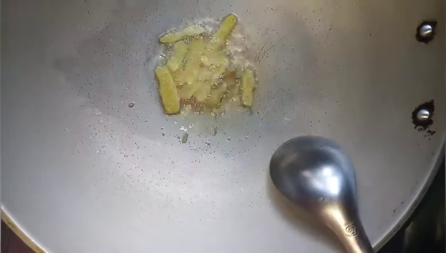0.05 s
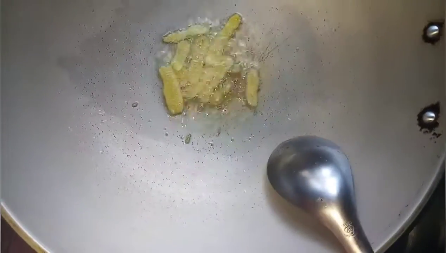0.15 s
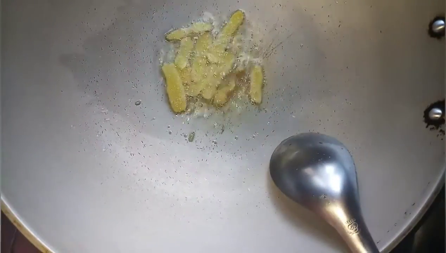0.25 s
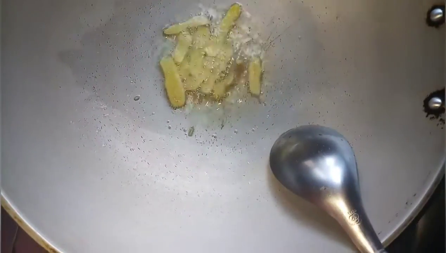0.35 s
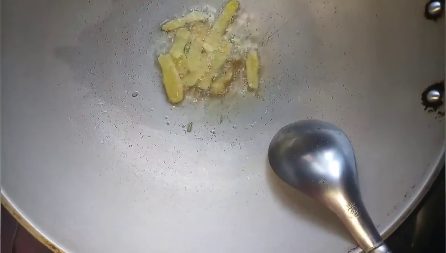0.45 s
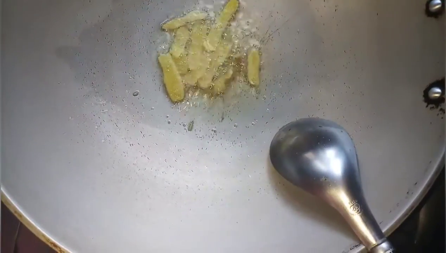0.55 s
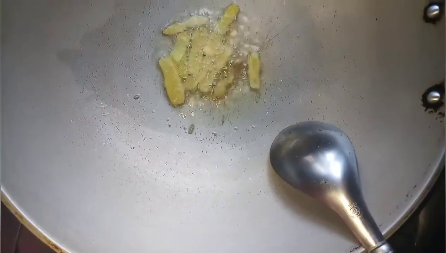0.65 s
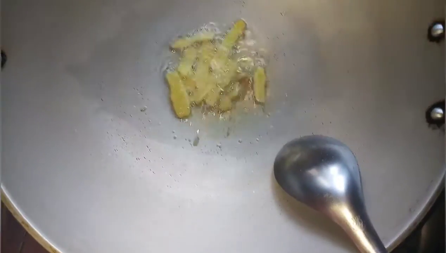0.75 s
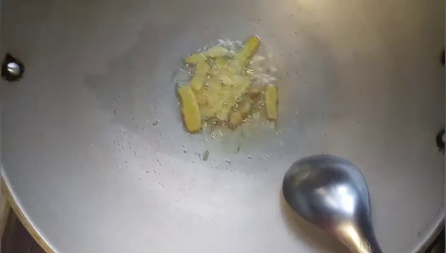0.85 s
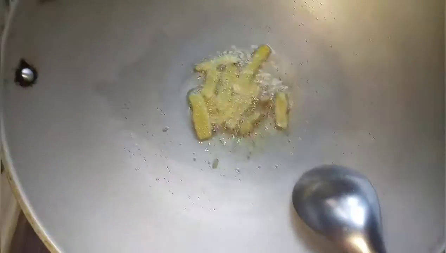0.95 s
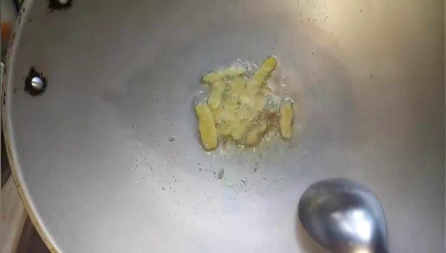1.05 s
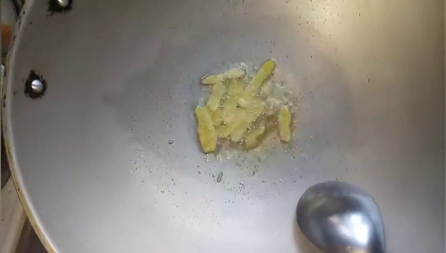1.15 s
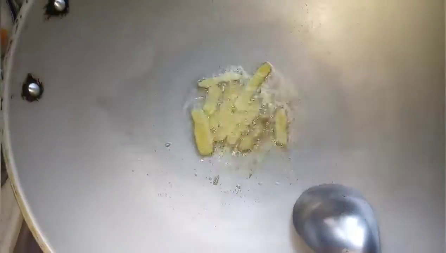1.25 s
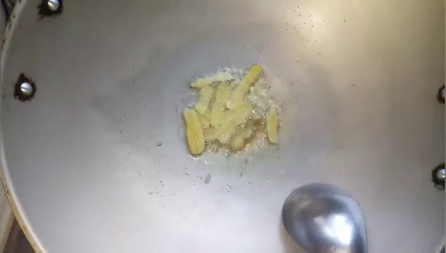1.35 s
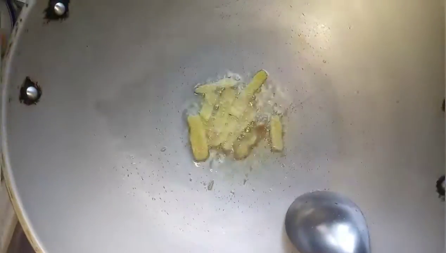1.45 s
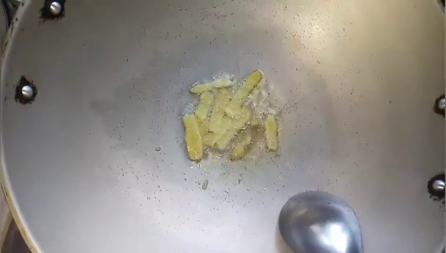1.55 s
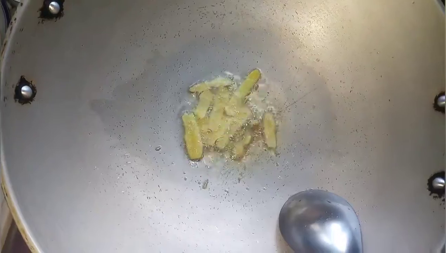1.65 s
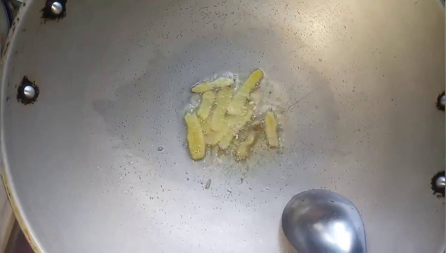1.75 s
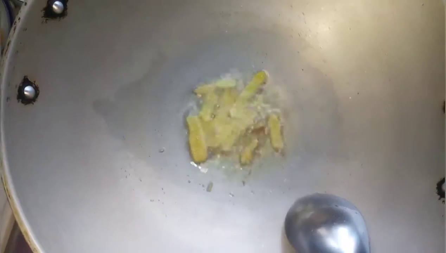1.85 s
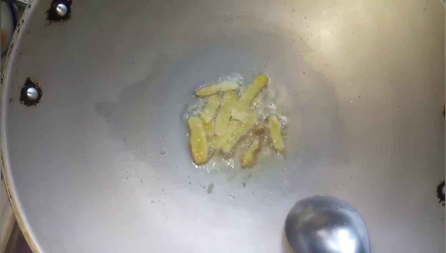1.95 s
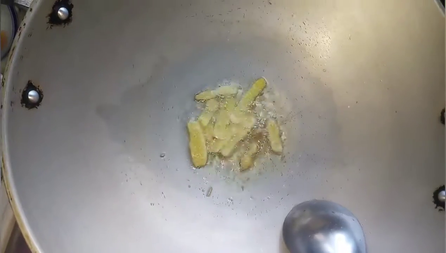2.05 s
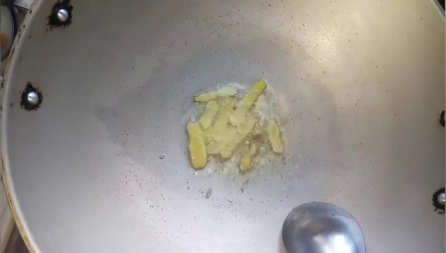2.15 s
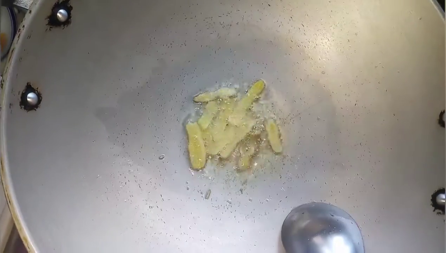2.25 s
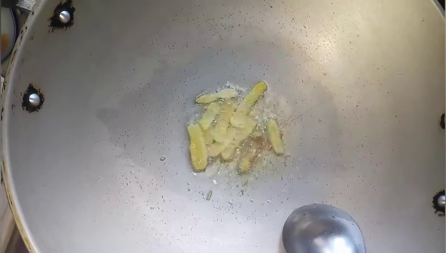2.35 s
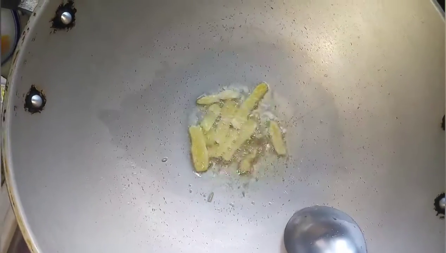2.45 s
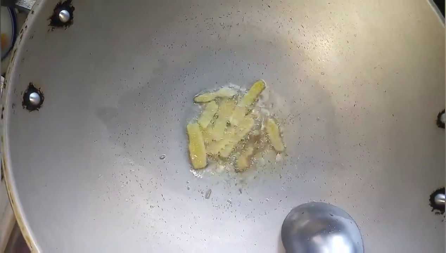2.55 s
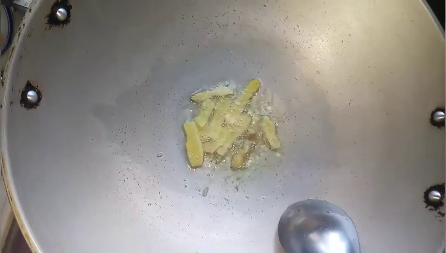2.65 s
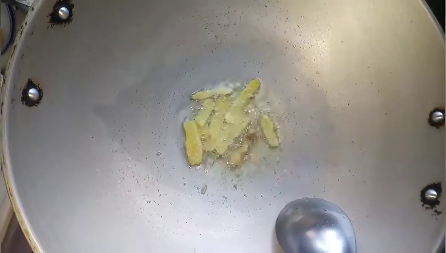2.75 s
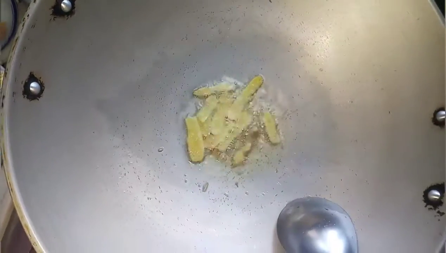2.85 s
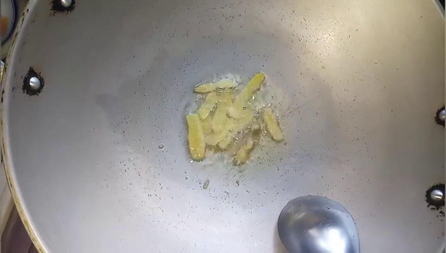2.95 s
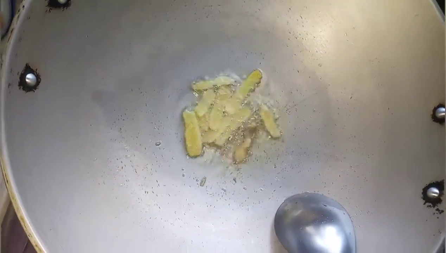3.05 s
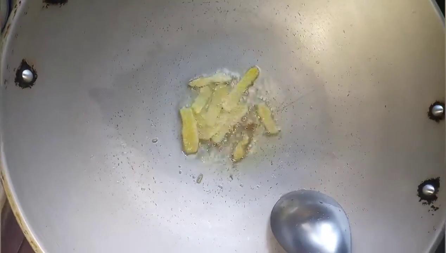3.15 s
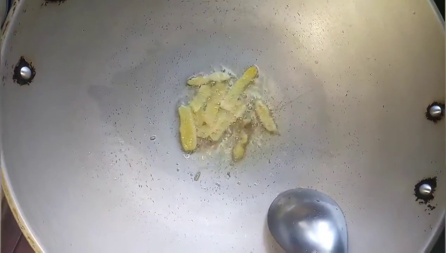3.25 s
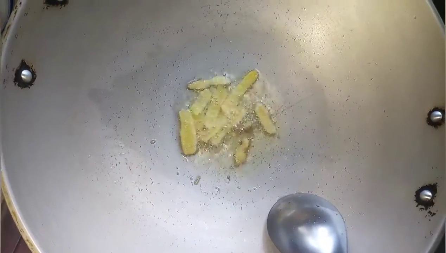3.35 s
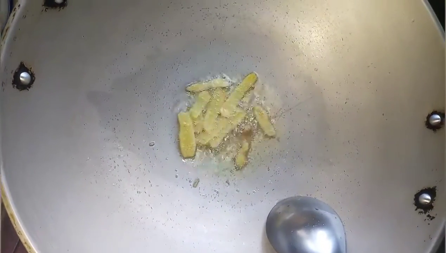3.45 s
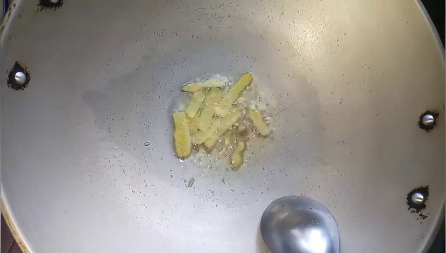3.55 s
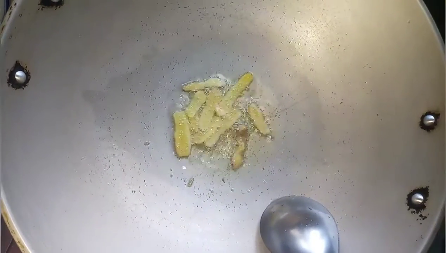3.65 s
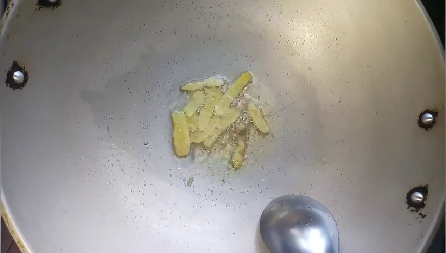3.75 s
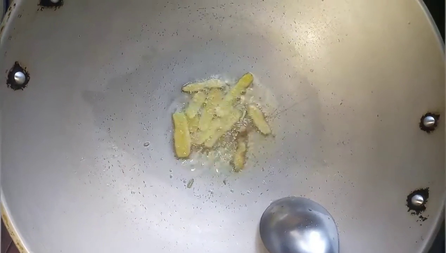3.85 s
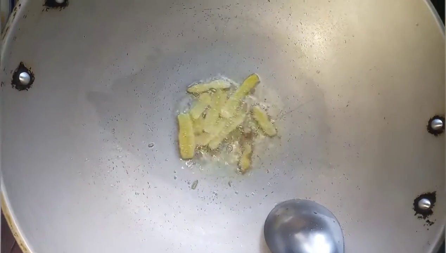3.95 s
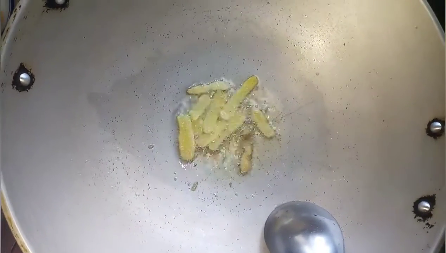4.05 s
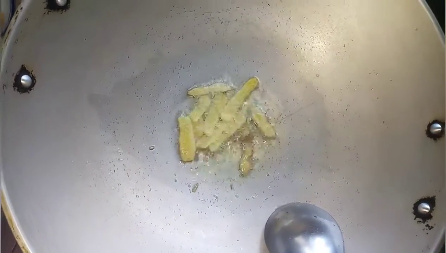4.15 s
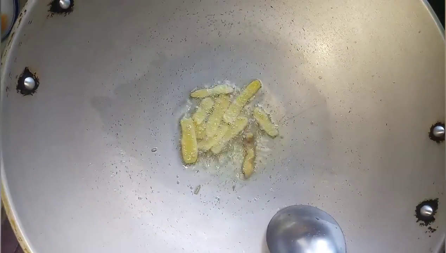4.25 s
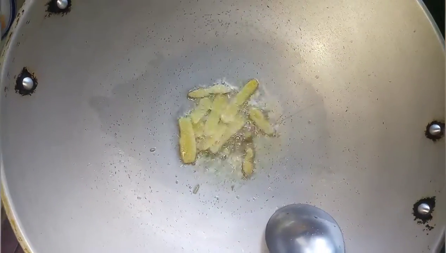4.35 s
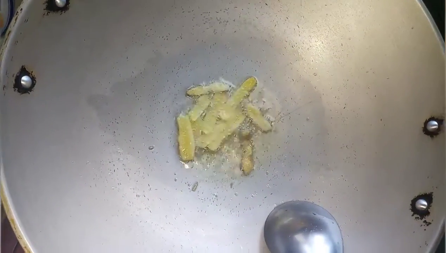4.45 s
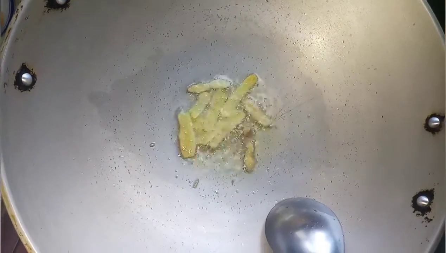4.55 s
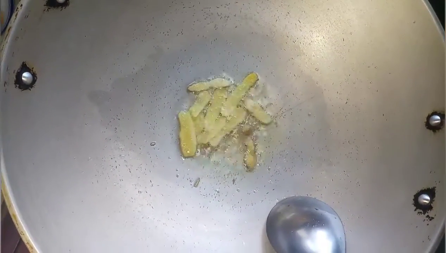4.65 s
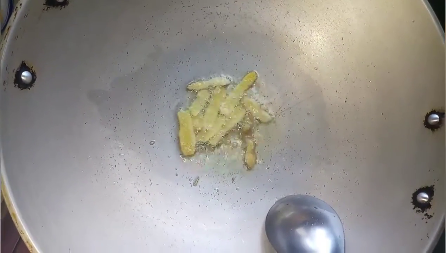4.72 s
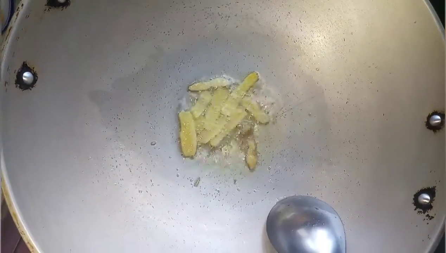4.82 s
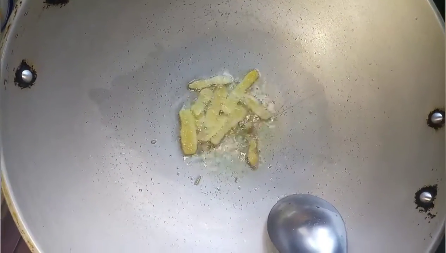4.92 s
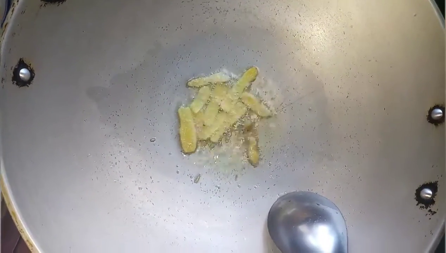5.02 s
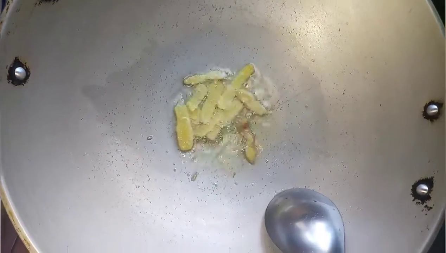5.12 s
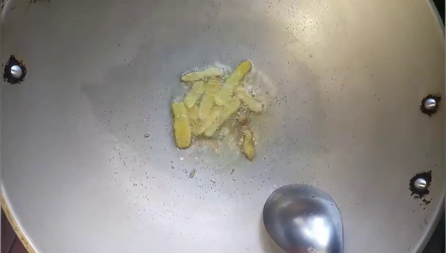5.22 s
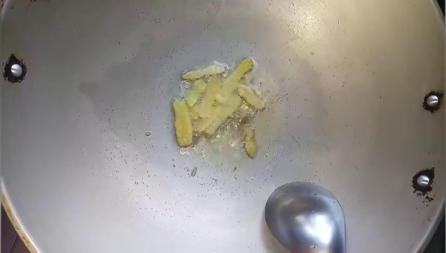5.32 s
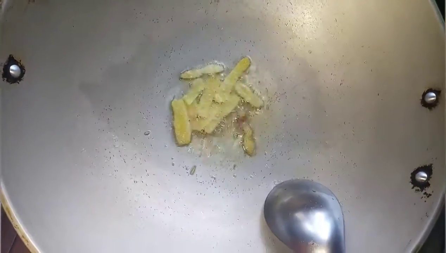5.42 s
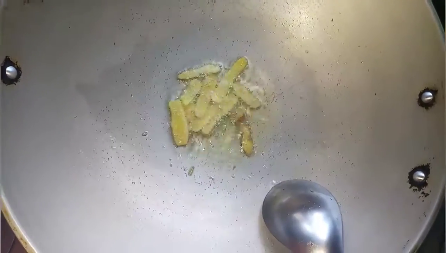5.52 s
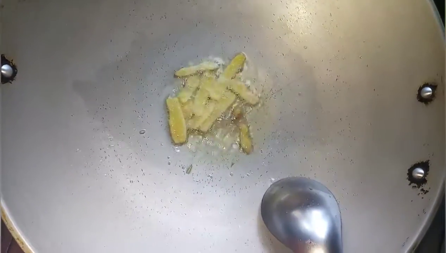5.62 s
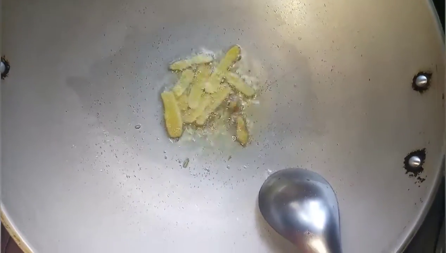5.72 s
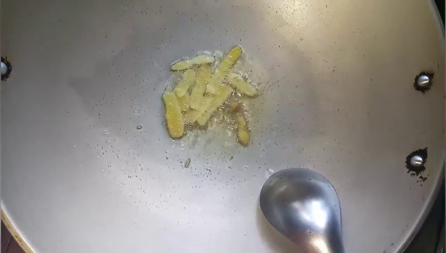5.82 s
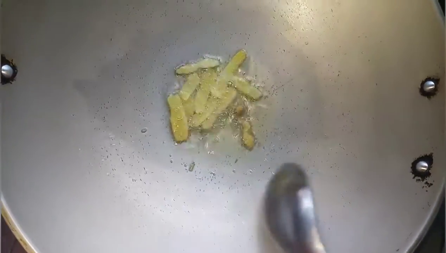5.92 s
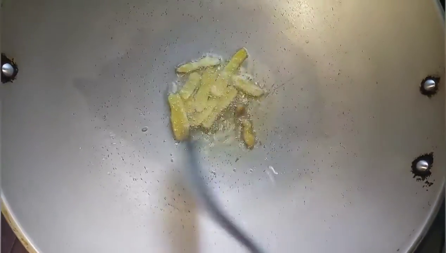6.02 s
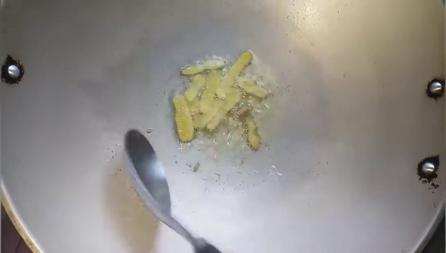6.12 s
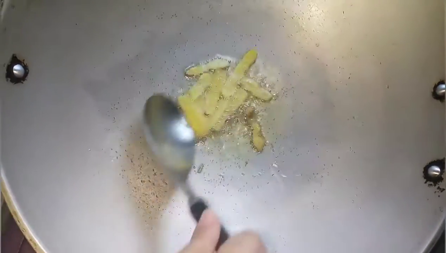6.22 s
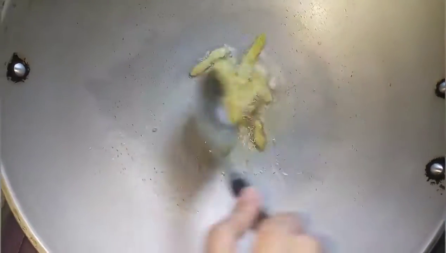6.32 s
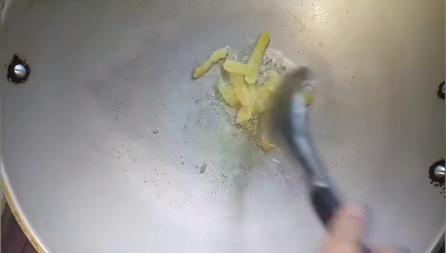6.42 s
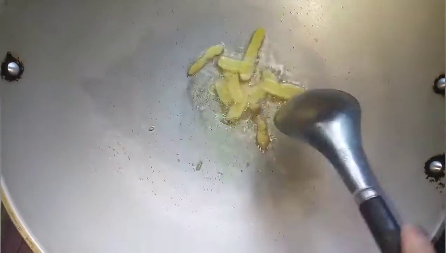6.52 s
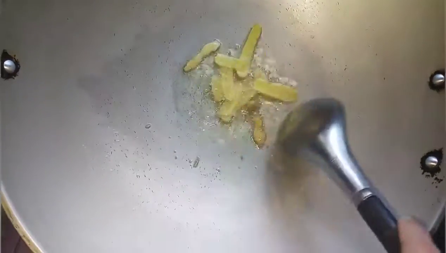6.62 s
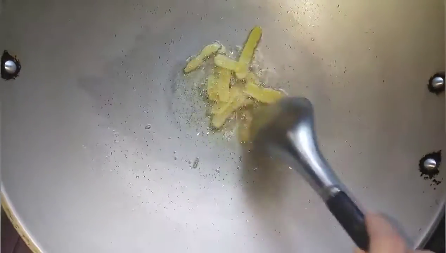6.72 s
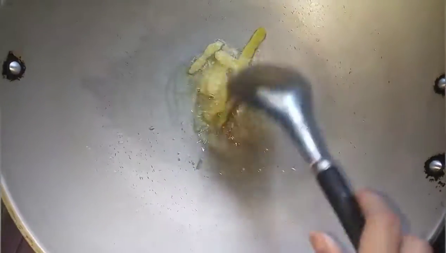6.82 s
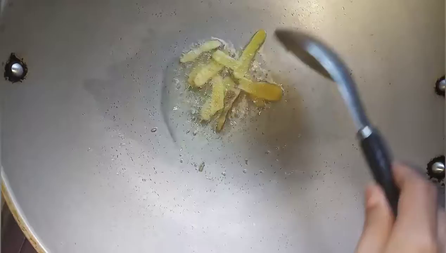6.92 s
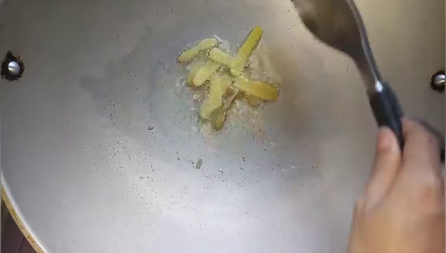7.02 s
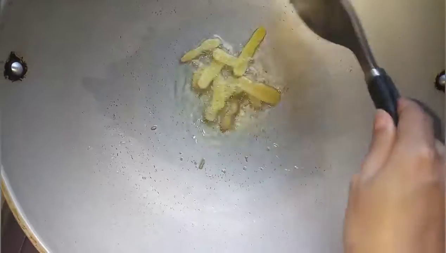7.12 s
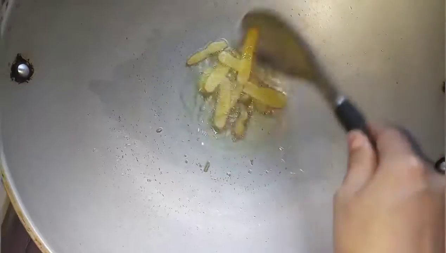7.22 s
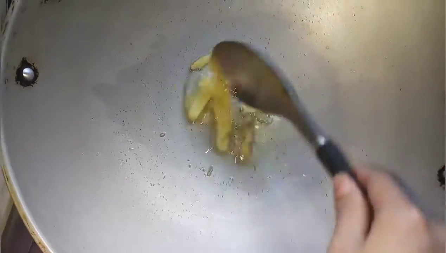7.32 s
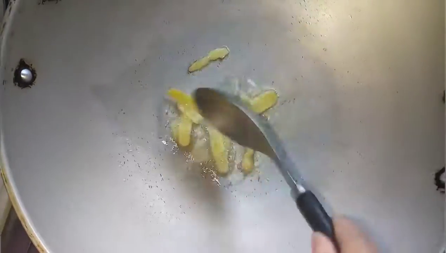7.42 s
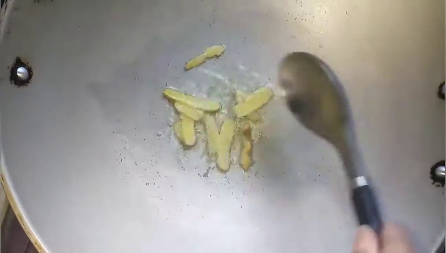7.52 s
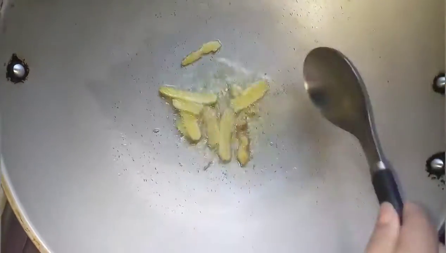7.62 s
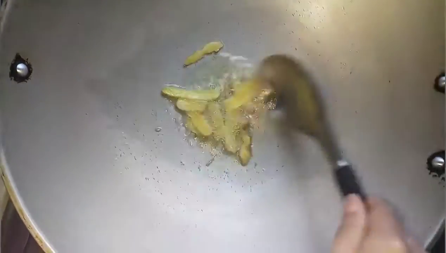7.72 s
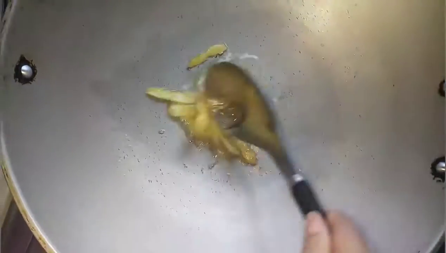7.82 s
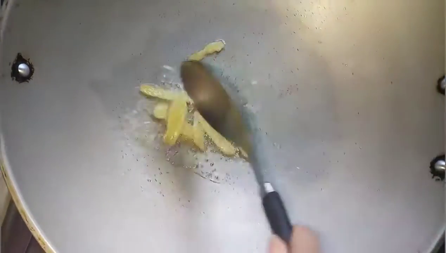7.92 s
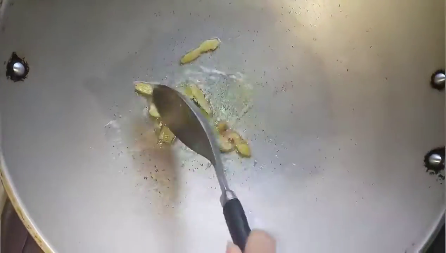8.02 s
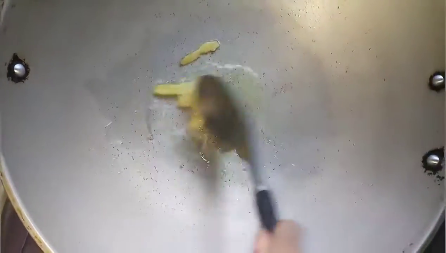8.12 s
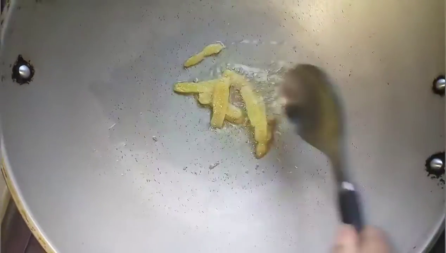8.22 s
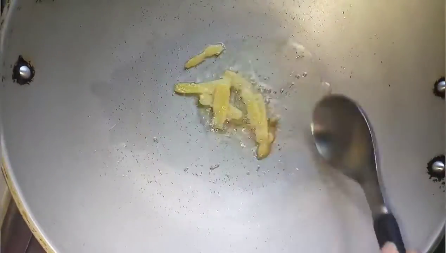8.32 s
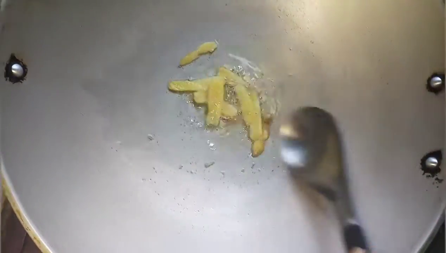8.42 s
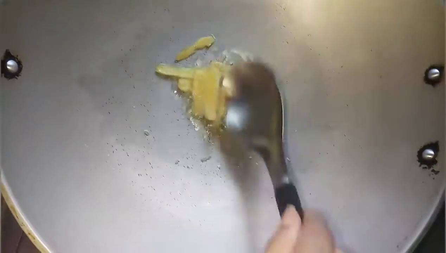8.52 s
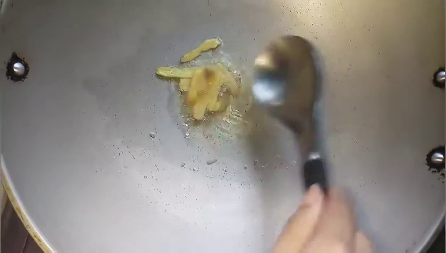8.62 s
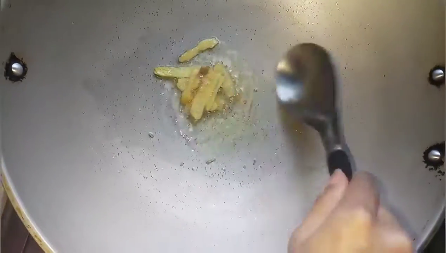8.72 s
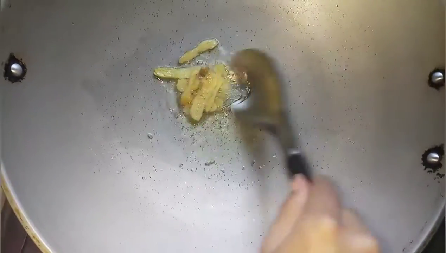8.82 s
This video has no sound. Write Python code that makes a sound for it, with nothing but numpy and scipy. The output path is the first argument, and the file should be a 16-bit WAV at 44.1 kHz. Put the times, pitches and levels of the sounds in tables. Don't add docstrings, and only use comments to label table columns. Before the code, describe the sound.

Steady frying hiss and snapping oil over a soft burner rumble, followed by bright ladle knocks and short scrapes on resonant steel.

```python
import sys
import numpy as np
from scipy import signal
from scipy.fft import rfft, irfft, next_fast_len
from scipy.io import wavfile
from scipy.ndimage import uniform_filter1d

SR = 44100
rng = np.random.default_rng(int(sys.argv[2]) if len(sys.argv) > 2 else 0)


def put_to_file(sound):
    columns = np.atleast_2d(sound).T
    safe = np.clip(columns, -1, 1)
    whole_steps = np.round(safe * 32767)
    wavfile.write(sys.argv[1], SR, whole_steps.astype(np.int16))


def elevation(decibels):
    levels = np.asarray(decibels, float)
    return 10 ** (levels / 20)


N = 391166
SIZE = next_fast_len(N, real=True)
HZ = np.fft.rfftfreq(SIZE, 1 / SR)
STEADY_DB = -48

# time [s], level [dB].
HEAT_CURVE = [(0.0, -47), (0.24, -47.5), (0.5, -51), (0.99, -48), (1.95, -46.5), (2.39, -46.5),
              (2.7, -47.5), (3.3, -48.5), (3.63, -46), (4.3, -47), (5.01, -46), (5.41, -48), (5.83, -47),
              (6.5, -48.5), (7.5, -51), (8.2, -50.5), (8.35, -46.5), (8.87, -46.5)]
# frequency [Hz], density [dB per Hz].
BUBBLE_SPECTRUM = [(410, -3), (700, -1), (863, -14.5), (1010, -2), (1250, -8.5), (1480, -5.5), (1680, -13),
                   (2270, -7), (2920, -13), (3160, -0.5), (4380, -6), (7010, -4), (13300, -20),
                   (16000, -26)]
# frequency [Hz], width [Hz], level [dB].
BOWL_MODES = [(976, 28, 3.5), (1380, 140, -2), (2040, 450, -13), (2800, 21, 17), (3130, 43, 1),
              (3600, 66, -7), (6900, 220, -28)]
# frequency [Hz], density [dB per Hz].
FLAME_SPECTRUM = [(15, -50), (25, -20), (54, -9), (85, -2.5), (114, -5.5), (151, -3.5), (301, -8.5),
                  (345, -7), (509, -14), (565, -11.5), (900, -24), (1170, -44), (1980, -120)]
# frequency [Hz], width [Hz], level [dB rms].
FAN_TONES = [(87.5, 9.04, -55), (143.4, 15.4, -60)]
# time [s], peak [dB], frequency [Hz], decay time t60 [s].
KNOCK = (2.5308, -30, 125, .04)
# start [s], peak [dB], pitch [Hz], echo t60 [s], broad crack [dB].
SPITTING_BUBBLES = [(0.0873, -23.5, 3970, 0.07, -4), (0.249, -34, 4760, 0.097, 9),
                    (0.257, -11.5, 3720, 0.12, -2), (0.2584, -17.5, 6050, 0.059, -20),
                    (0.5556, -16.5, 6040, 0.03, -5.5), (0.7666, -22.5, 3130, 0.039, 2),
                    (0.7692, -35, 6400, 0.023, -24), (1.7214, -16, 5900, 0.021, -1.5),
                    (2.1129, -3, 3620, 0.041, -14), (2.1132, -19, 6790, 0.042, -18),
                    (2.3424, -22.5, 7500, 0.078, -5), (2.4184, -14, 4380, 0.067, -7.5),
                    (2.4183, -4.5, 3650, 0.0096, -20), (3.6226, -8.5, 3030, 0.087, -13),
                    (3.688, -19.5, 5350, 0.05, -7), (3.689, -23.5, 3330, 0.04, -20),
                    (5.2106, -19.5, 6800, 0.053, -8), (7.431, -28.5, 3600, 0.053, 3),
                    (7.6197, -18.5, 6170, 0.027, -4.5), (6.201, -40, 14300, 0.04, -30),
                    (8.457, -38, 12500, 0.04, -30), (8.778, -27, 12400, 0.06, -30)]
# start [s], peak [dB], pitch [Hz],
# broad crack [dB].
SMALL_BUBBLES = [(0.6477, -25.5, 5300, -1), (0.9662, -34.5, 3400, -1), (1.6536, -37, 3280, 2),
                 (1.815, -36, 7400, -8), (1.955, -47, 3500, 17), (2.375, -30, 5160, 7),
                 (2.9203, -36, 3400, -6), (3.072, -42.5, 3440, 11.5), (3.4528, -30.5, 3560, -10),
                 (4.046, -30, 8960, 1), (4.1754, -36, 5850, -3), (4.3685, -35, 3130, 7),
                 (4.7107, -30.5, 7760, -8), (5.04, -34.5, 9300, 0), (5.1058, -29, 5560, 3),
                 (5.938, -25, 3700, -8), (5.947, -31, 4500, -11), (5.965, -29, 3340, -13),
                 (6.121, -26, 7200, -8), (6.93, -36, 5950, 1), (6.975, -40, 6000, -5),
                 (7.1034, -38, 5700, 9.5), (7.1526, -37, 7300, -10), (3.02, -36, 5500, -6),
                 (7.7508, -29, 6700, -3), (8.1369, -35, 3730, 7), (8.2315, -31.5, 3380, 2.5),
                 (8.243, -33, 3900, 1), (8.6223, -35.5, 2960, -3), (8.775, -20, 5300, -4)]
# start [s], peak [dB], pitch [Hz], echo t60 [s].
DEEP_POCKETS = [(0.087, -36.5, 1500, 0.09), (0.255, -21.5, 1140, 0.062), (0.257, -35, 312, 0.24),
                (0.257, -23, 2400, 0.18), (3.6235, -30, 2200, 0.06), (1.031, -36, 1040, 0.045),
                (2.921, -32.5, 1450, 0.028), (3.452, -32.5, 1320, 0.041), (4.461, -36, 1970, 0.078),
                (5.98, -41, 1050, 0.044), (6.088, -38.5, 1030, 0.052), (6.759, -21, 750, 0.056),
                (6.202, -28, 393, 0.14), (7.245, -34, 800, 0.08), (7.778, -36, 650, 0.08)]
# start [s], peak [dB], pitch [Hz], echo t60 [s].
STEAM_WHISTLES = [(7.432, -22, 3600, 0.062), (0.647, -30, 5550, 0.08), (0.25, -24, 1220, 0.12),
                  (0.26, -28, 900, 0.16), (3.63, -31, 4700, 0.084), (8.505, -33, 1450, 0.14),
                  (0.06, -39, 3750, 0.45), (0.3, -41, 2900, 0.17), (2.125, -34, 3700, 0.15),
                  (2.462, -29, 4800, 0.072), (3.646, -30, 2850, 0.14), (5.9, -35, 3700, 0.082),
                  (6.319, -26, 2570, 0.15), (7.794, -29, 2290, 0.15)]
# start [s], peak [dB], pitch [Hz], echo t60 [s], width [share of pitch].
SINGLE_MODES = [(6.759, -20, 1500, .04, .35), (6.759, -24, 2000, .04, .25), (6.759, -20, 2785, .06, .05),
                (6.759, -24, 4580, .05, .06), (6.759, -24, 6120, .05, .08), (6.759, -21, 7300, .05, .1),
                (6.76, -30, 9010, .05, .06), (6.76, -27, 8200, .06, .2), (6.762, -38, 11000, .04, .15),
                (6.215, -30, 10500, .08, .05), (6.203, -14, 4700, .035, .25), (6.217, -43, 14000, .1, .06),
                (6.2165, -11, 4300, .03, .3), (6.217, -24, 7000, .05, .1), (8.851, -22, 3130, .07, .05),
                (6.307, -27, 3500, .06, .08), (7.2468, -5, 3500, .012, .35), (7.248, -17, 3130, .07, .06),
                (8.785, -17, 3980, .08, .05), (7.245, -27, 210, .1, .5), (7.245, -30, 500, .04, .5),
                (7.294, -22, 3200, .05, .1), (7.777, -22, 3250, .03, .15), (7.786, -20, 3200, .03, .15),
                (7.777, -30, 7000, .04, .06), (7.797, -30, 5500, .05, .1), (7.777, -36, 400, .04, .5),
                (7.809, -39, 350, .05, .5), (8.468, -21, 3150, .03, .1), (8.527, -25, 4100, .04, .12),
                (8.534, -22, 3150, .04, .08), (8.508, -33, 6800, .1, .06), (8.545, -34, 2450, .1, .1),
                (8.778, -17, 5050, .05, .08), (0.086, -37, 900, .08, .2), (0.087, -36, 2000, .05, .25),
                (0.09, -38, 1420, .06, .08), (0.088, -35, 4800, .05, .15), (3.624, -27, 2100, .06, .2),
                (0.766, -34, 2200, .05, .25)]
# start [s], peak [dB], bowl band 0.9-2.6 kHz [dB], rim band above 4.5 kHz [dB], echo t60 [s].
LADLE_BLOWS = [(6.1879, -26.5, -31, -9, 0.045), (6.201, -8, -14, -3, 0.045), (6.2165, -17, -25, -4, 0.05),
               (6.759, -7, -11, -18, 0.04), (7.2445, -12, -20, -5.5, 0.12), (7.7757, -28, -34, -9, 0.11),
               (7.7841, -25, -8, -9, 0.07), (7.8064, -28, -28, -7, 0.082), (8.4574, -13, -15.5, -7, 0.13),
               (8.5342, -29, -31, -6, 0.13), (8.7773, -10, -12, -1.5, 0.1), (8.8503, -22, -27, -17, 0.072)]
# time [s], pressure [dB].
SCRAPE_PRESSURES = [
    [(5.88, -60), (5.9, -53), (5.968, -37), (6.02, -65)],
    [(6.21, -17), (6.25, -28), (6.266, -24), (6.34, -28.5), (6.385, -54)],
    [(6.775, -18), (6.783, -25), (6.809, -29), (6.87, -57)],
    [(7.255, -30), (7.285, -27), (7.295, -23.5), (7.317, -28), (7.38, -52)],
    [(7.78, -33), (7.81, -23), (7.822, -41), (7.84, -42), (7.88, -48)],
    [(8.17, -48), (8.216, -41.5), (8.244, -42), (8.28, -64)],
    [(8.47, -32), (8.49, -33), (8.534, -24), (8.574, -38.5), (8.6, -58)],
    [(8.79, -17), (8.814, -30), (8.846, -29.5), (8.856, -23), (8.87, -32)],
]
# thud [dB], bowl [dB], rim [dB].
SCRAPE_TOUCHES = [(-23.5, -8, -9), (-24, -7, -8), (-15, -6.5, -11), (-22, -13, -5.5), (-22.5, -11.5, -6.5),
                  (-28, -9.5, -7), (-24, -12, -8.5), (-23.5, -6.5, -12)]
# frequency [Hz], width [Hz], level [dB].
STRUCK_MODES = [(208, 14, -15), (1445, 48, -16), (2315, 32, -14), (2787, 28, -9), (3132, 59, 0.5),
                (3150, 180, -13.5), (3400, 25, -11), (3640, 40, -12), (3990, 47, -2.5), (4770, 25, -7),
                (4950, 35, -5), (5350, 57, -2.5), (5630, 29, -11), (5980, 117, -6.5), (6790, 140, -2),
                (7290, 40, -10), (7100, 31, -7), (7980, 50, -8.5), (8300, 17, -11), (8070, 190, -20.5),
                (8990, 40, -15), (8960, 100, -23.5), (10500, 27, -36), (10470, 43, -15)]
# frequency [Hz], width [Hz], level [dB].
RUBBED_MODES = [(387, 24, -33), (1332, 70, -11.5), (2274, 103, -2), (2465, 8.5, 1.5), (2733, 11, 1.5),
                (3033, 46, 5), (3400, 74, 0), (3960, 45, 0), (4640, 48, 1), (5300, 36, -9),
                (5300, 170, -3.5), (5760, 170, -2), (6200, 71, -5), (6790, 200, -2.5), (7440, 53, -6),
                (7750, 120, -14), (8600, 36, -14), (8500, 42, -36), (10400, 54, -12), (11200, 25, -37),
                (12100, 70, -63), (12100, 29, -32)]
# frequency [Hz], width [Hz], level [dB].
SCRATCH_MODES = [(11800, 500, -22.5), (13500, 1900, -28), (14500, 400, -25)]
# frequency [Hz], density [dB per Hz].
DENSE_MODES = [(71, -58), (120, -12), (378, -3), (789, -15.5), (1460, -20.5), (1750, -12), (3050, -5.5),
               (3900, 4), (4410, -0.5), (10400, -13.5), (16000, -61)]
# frequency [Hz], coherence [0-1].
PORT_LIKENESS = [(25, .8), (60, .95), (150, .89), (350, .89), (700, .62), (1400, .55), (2500, .4),
                 (12000, .15)]
# frequency [Hz], left minus right [dB].
PORT_BALANCE = [(60, 1.5), (200, -0.5), (380, -1), (700, 0.5), (1290, 3), (2380, -3.5), (4400, -2.5),
                (8120, -0.5), (15000, 3)]


def evened(x):
    return x / np.sqrt(np.mean(x ** 2) + 1e-20)


def read(points, hz):
    f, value = np.transpose(points)
    return np.interp(np.log(hz + 1), np.log(f + 1), value)


def coloured(x, gain):
    return irfft(rfft(x, SIZE) * gain, SIZE)[..., :N]


def modes(table, hz):
    response = 0
    for k, (f, width, db) in enumerate(table):
        response = response + (-1) ** k * elevation(db) / (1 + 2j * (hz - f) / width)
    return response


def add(mix, s, sound):
    part = mix[..., round(s * SR):][..., :sound.shape[-1]]
    part += sound[..., :part.shape[-1]]


def heat(follows):
    s, heat_db = np.transpose(HEAT_CURVE)
    return elevation(follows * (np.interp(np.arange(N) / SR, s, heat_db) - STEADY_DB))


def bubble_hiss():
    frames = N // 64 + 5
    a, b, c, d, patches = rng.standard_normal((frames, 129, 5)).T
    patches = evened(uniform_filter1d(uniform_filter1d(patches, 5, 0), 40, 1))
    flicker = evened(uniform_filter1d(rng.standard_normal(frames), 25))
    spectrum = np.array([a + 1j * b, c + 1j * d]) * elevation(0.94 * patches + 1.44 * flicker)
    return signal.istft(spectrum, nperseg=256, noverlap=192)[1][:, :N]


def bubble_crackle():
    crackle, t = np.zeros((2, N)), np.arange(1500) / SR
    hz = np.fft.rfftfreq(len(t), 1 / SR)
    for pitch_hz in np.geomspace(1000, 11000, 14):
        sizes = elevation(4.5 * np.minimum(rng.exponential(1, N), 2.2))
        clicks = sizes * (rng.random(N) < 8 / SR)
        field = rng.standard_normal((2, len(t))) * elevation(-60 * t / .06)
        grain = irfft(rfft(field) * modes([(pitch_hz, .35 * pitch_hz, 0)], hz), len(t))
        grain = evened(grain) * np.sqrt(pitch_hz)
        crackle += signal.oaconvolve(clicks[None], grain, axes=1)[:, :N]
    return crackle


def fizz():
    slow_db, slow_follows = -56.5, 0.66
    spread_s, spread_db_per_s = 5.15, -1
    bubbles = evened(bubble_hiss()) + elevation(-10.5) * evened(bubble_crackle())
    bowl = elevation(read(BUBBLE_SPECTRUM, HZ)) * (elevation(4.5) + abs(modes(BOWL_MODES, HZ)))
    bowl = bowl / (1 + (700 / (HZ + 1)) ** 4)
    low_share = 1 / (1 + (HZ / 1900) ** 8)
    fine = evened(coloured(bubbles, bowl * np.sqrt(1 - low_share)))
    slow = evened(coloured(bubbles, bowl * np.sqrt(low_share)))
    thinning = elevation(spread_db_per_s * np.maximum(np.arange(N) / SR - spread_s, 0))
    return elevation(STEADY_DB + 2) * heat(0.76) * fine + elevation(slow_db) * thinning * heat(slow_follows) * slow


def flame():
    rumble_db, rumble_follows = -53.5, 0.71
    noise = coloured(rng.standard_normal((2, N)), elevation(read(FLAME_SPECTRUM, HZ)))
    return elevation(rumble_db) * heat(rumble_follows) * evened(noise)


def fan():
    tones = np.zeros(N)
    for hz, width, db in FAN_TONES:
        drift = uniform_filter1d(uniform_filter1d(rng.standard_normal(N), 3000), 3000)
        waver = width * evened(drift)
        tones += elevation(db) * np.sin(2 * np.pi * np.cumsum(hz + 0.3934 * waver) / SR)
    return tones * [[0], [1]]


def knock():
    out = np.zeros((2, N))
    s, peak_db, hz, t60 = KNOCK
    t = np.arange(2000) / SR
    glide = 1 + 9 * np.exp(-t / .0016)
    add(out[1], s, elevation(peak_db - 60 * t / t60) * np.sin(2 * np.pi * np.cumsum(hz * glide) / SR))
    return out


def echoes(t60, direct_db, hold=1.05):
    rise_s, walls_db, walls_t60 = 0.00042, -17, 0.28
    t = np.arange(SR // 4) / SR
    direct = elevation(direct_db - 60 * t / 0.023)
    inside = elevation(-60 * (t / max(t60, .01)) ** hold)
    walls = elevation(walls_db - 60 * t / walls_t60)
    rise = 1 - np.exp(-t / rise_s)
    return rng.standard_normal((2, len(t))) * rise * (direct + inside + walls)


def pop(pitch_hz, t60, share, crack_db, hold=1.23):
    snap_db = 13.5
    hz = np.fft.rfftfreq(SR // 4, 1 / SR)
    broad = elevation(read(BUBBLE_SPECTRUM, hz)) / (1 + (2400 / (hz + 1)) ** 4) / (1 + (hz / 9000) ** 6)
    off = 2j * (hz - pitch_hz) / (max(share, .03) * pitch_hz)
    ring = 1 / (1 + off) / (1 + off + off ** 2)
    ringing = (elevation(snap_db) + rfft(echoes(t60, -18.0, hold))) * ring
    crack = rfft(echoes(0.83 * t60, direct_db=-28)) * elevation(crack_db) * broad
    return elevation(-7.5) * irfft((ringing + crack) / np.sqrt(np.mean(abs(ring) ** 2)), SR // 4)


def pops():
    out = np.zeros((2, N))
    for s, db, hz, t60 in STEAM_WHISTLES:
        add(out, s, elevation(db) * pop(hz, t60, share=0.1, crack_db=-30))
    for s, db, hz, t60, crack_db in SPITTING_BUBBLES:
        add(out, s, elevation(db) * pop(hz, t60, 0.22, crack_db, hold=1.19))
    for s, db, hz, t60 in DEEP_POCKETS:
        add(out, s, elevation(db) * pop(hz, t60, share=0.76, crack_db=-22))
    for s, db, hz, crack_db in SMALL_BUBBLES:
        add(out, s, elevation(db) * pop(hz, 0.047, 0.21, crack_db))
    return out


def clinks():
    out = np.zeros((2, N))
    for s, db, hz, t60, share in SINGLE_MODES:
        add(out, s, elevation(db) * pop(hz, t60, share, crack_db=-30))
    return out


def causal(gain):
    cepstrum = irfft(np.log(gain + 1e-5), SIZE)
    cepstrum[1:SIZE // 2] *= 2
    return np.exp(rfft(cepstrum[:SIZE // 2], SIZE))


def steel(drive, table, dense_db):
    body = abs(modes(table, HZ)) + elevation(read(DENSE_MODES, HZ) + dense_db)
    below = [0 * HZ] + [1 / (1 + (HZ / edge) ** 8) for edge in (900, 2600, 4500)] + [1 + 0 * HZ]
    families = body * np.sqrt(abs(np.diff(below, axis=0)))
    out = 0
    for force, family in zip(drive, families):
        out = out + coloured(force, causal(family / np.sqrt(np.mean(family ** 2))))
    return out


def scrapes():
    follows, usual_db = [0.51, 0.82, 0.94, 0.9], -28
    chatter_per_s, chatter_db = 105, 0
    rubbed = np.zeros((4, 2, N))
    for rows, (thud_db, bowl_db, rim_db) in zip(SCRAPE_PRESSURES, SCRAPE_TOUCHES):
        s, pressure_db = np.transpose(rows)
        t = np.arange(s[0], s[-1], 1 / SR)
        family_db = np.outer(follows, np.interp(t, s, pressure_db) - usual_db)
        family_db = family_db + [[thud_db], [bowl_db], [0], [rim_db]]
        slips = elevation(1.4 * evened(uniform_filter1d(rng.standard_normal((4, 1, len(t))), 60)))
        uneven = elevation(3 * evened(uniform_filter1d(rng.standard_normal(len(t)), 500)))
        hops = np.cumsum(chatter_per_s * uneven) / SR
        chatter = elevation(chatter_db * (1 - 2 * (hops % 1)))
        rub = evened(slips * chatter * rng.standard_normal((2, len(t))))
        rub = rub * signal.windows.tukey(len(t), .15)
        add(rubbed, s[0], elevation(family_db + usual_db + 2.5)[:, None] * rub)
    return steel(rubbed, RUBBED_MODES + SCRATCH_MODES, dense_db=-13.5)


def blows():
    thud_db, thud_follows = -29, 0.71
    struck = np.zeros((4, 2, N))
    for s, peak_db, bowl_db, rim_db, t60 in LADLE_BLOWS:
        thud = thud_follows * peak_db + thud_db
        family_db = np.array([thud, peak_db + bowl_db, peak_db, peak_db + rim_db])
        add(struck, s, elevation(family_db - 2)[:, None, None] * echoes(t60, direct_db=0))
    return steel(struck, STRUCK_MODES, dense_db=-17.5)


def scene():
    steady = fizz() + flame() + fan() + knock()
    sharp = pops() + clinks() + scrapes() + blows()
    return sharp * elevation([[-2.5], [0]]) + steady


def roll_off(x):
    return signal.sosfilt(signal.butter(12, 15830, fs=SR, output="sos"), x)


def record(dry):
    same, lean = read(PORT_LIKENESS, HZ), elevation(read(PORT_BALANCE, HZ) / 2)
    own, shared = rfft(dry, SIZE)
    early = np.exp(1j * np.minimum(2 * np.pi * HZ * .00012, np.pi / 2))
    left = (same * early * shared + np.sqrt(1 - same ** 2) * own) * lean
    heard = irfft(np.array([left, shared / lean]), SIZE)[:, :N]
    heard = heard / (1 + (heard / 1.05) ** 6) ** (1 / 6)
    return roll_off(heard)


dry = scene()
out = record(dry)
put_to_file(out)
```